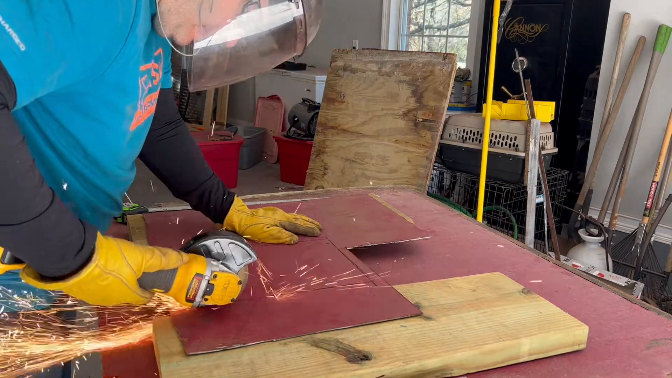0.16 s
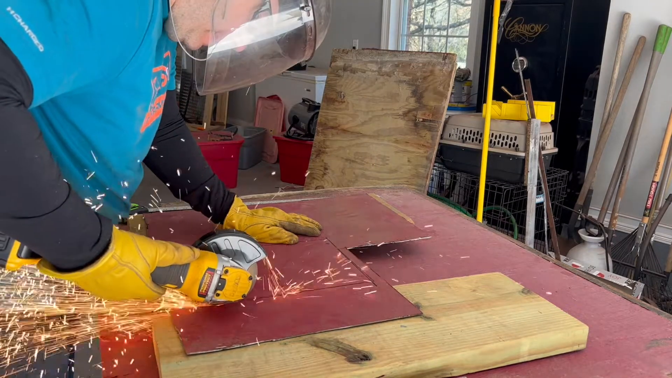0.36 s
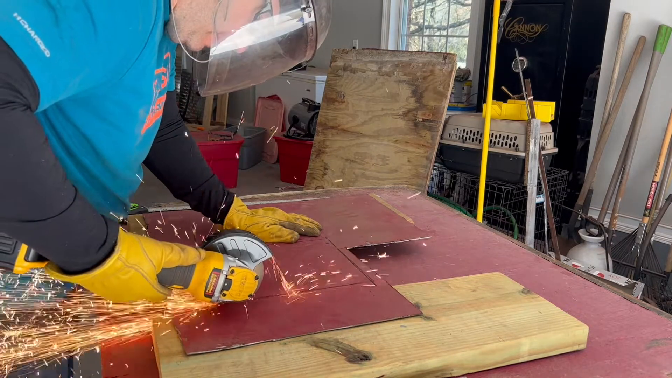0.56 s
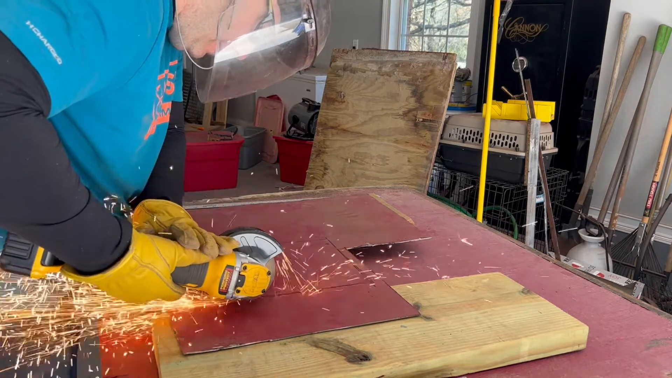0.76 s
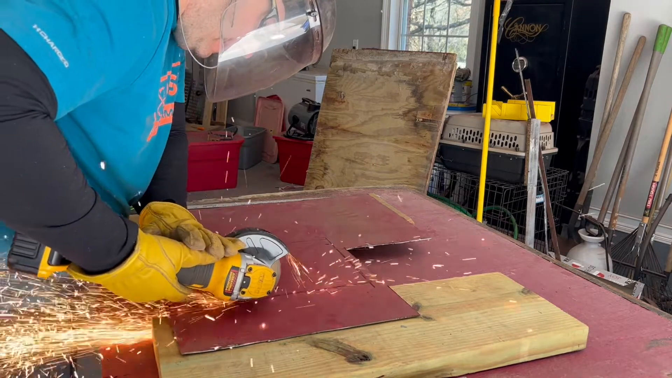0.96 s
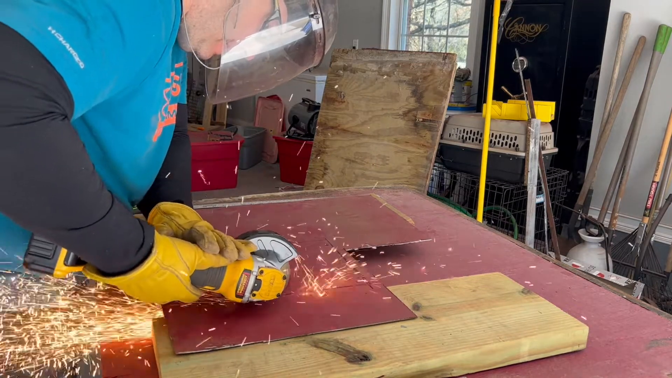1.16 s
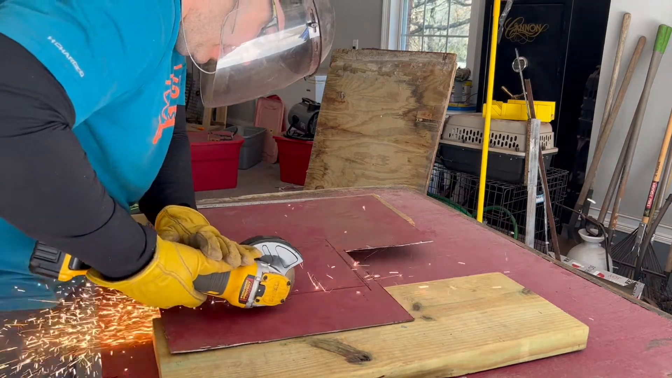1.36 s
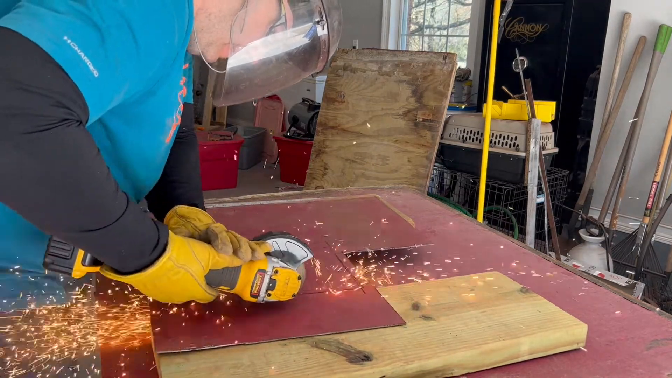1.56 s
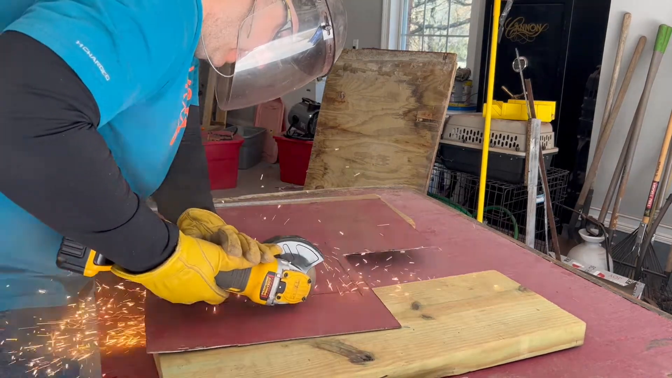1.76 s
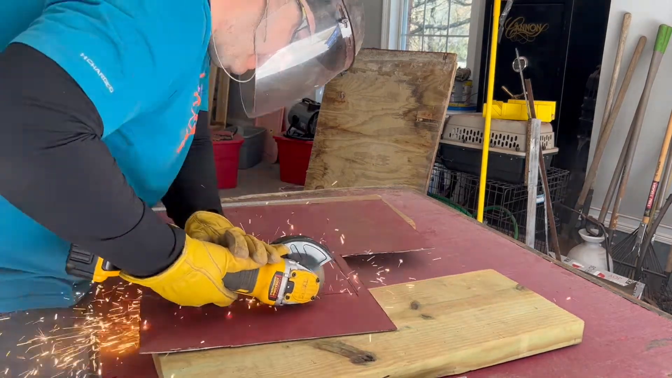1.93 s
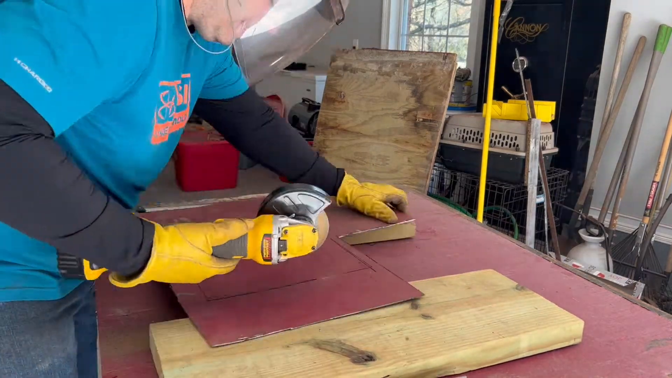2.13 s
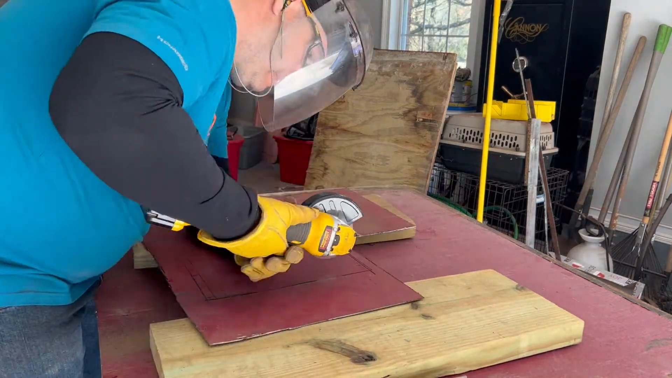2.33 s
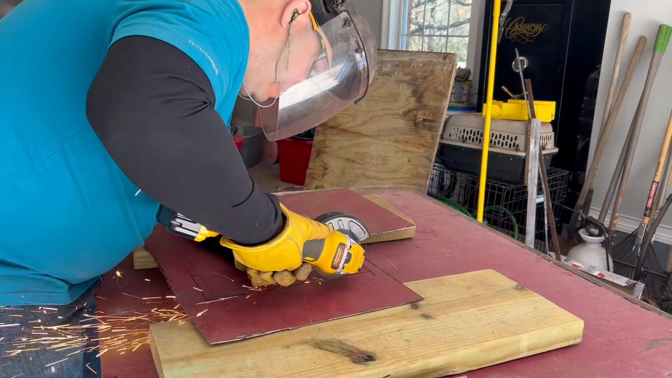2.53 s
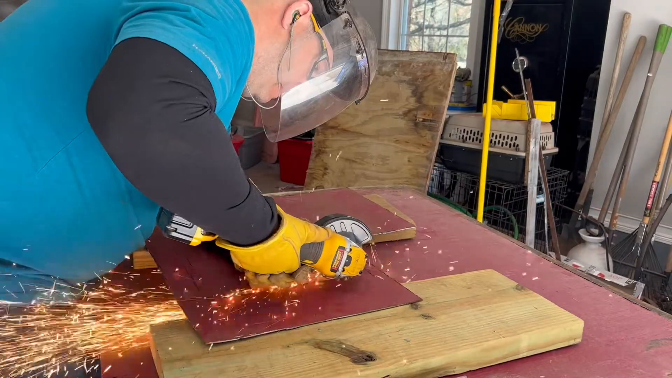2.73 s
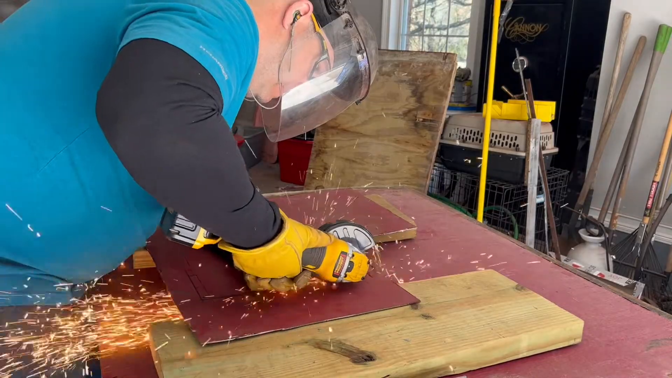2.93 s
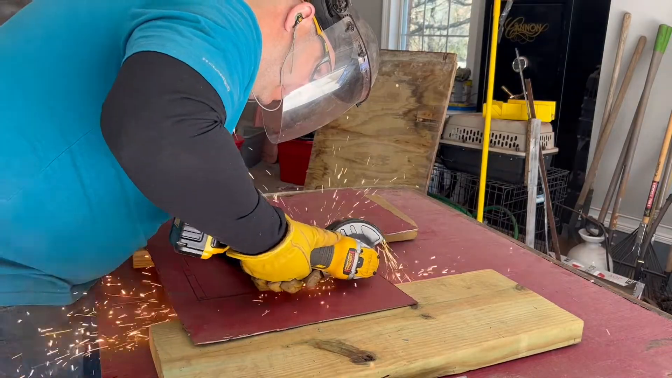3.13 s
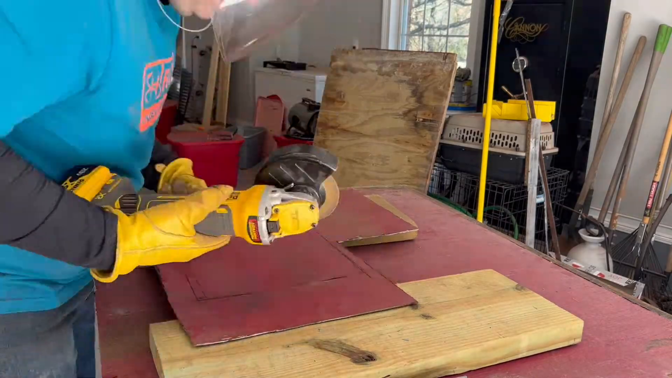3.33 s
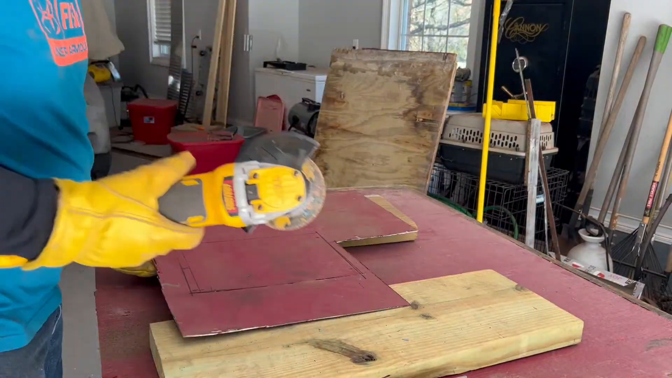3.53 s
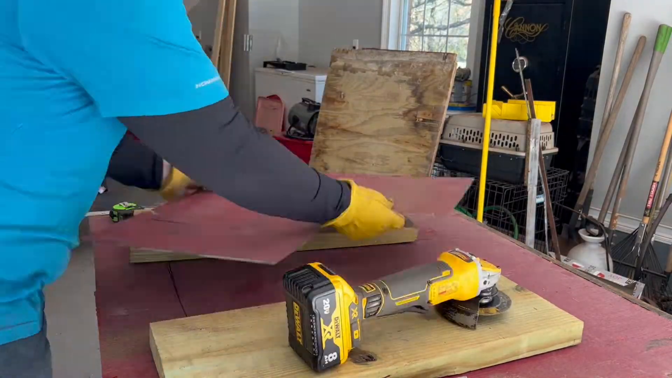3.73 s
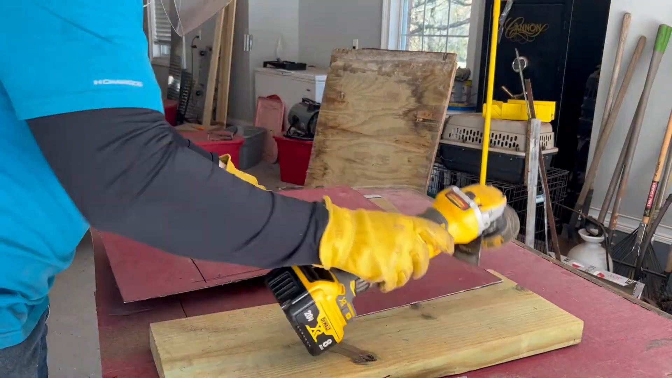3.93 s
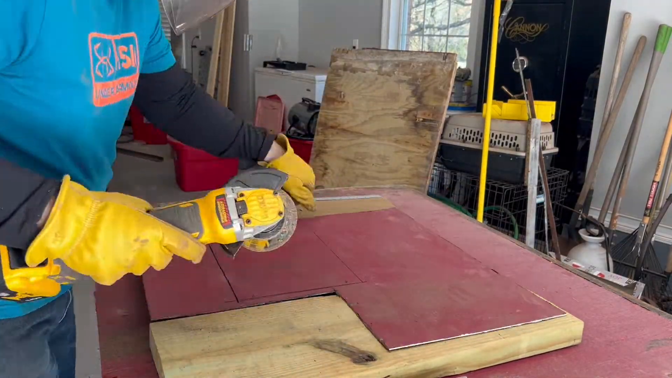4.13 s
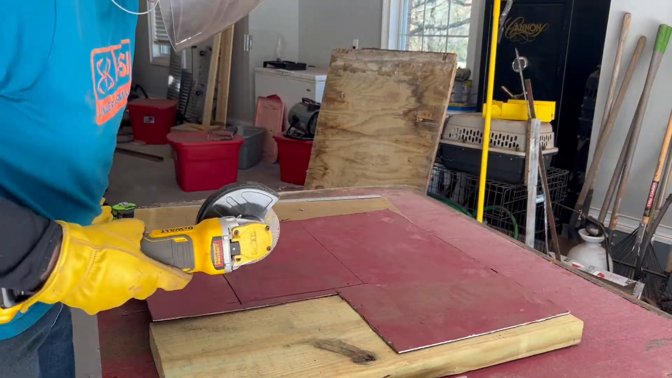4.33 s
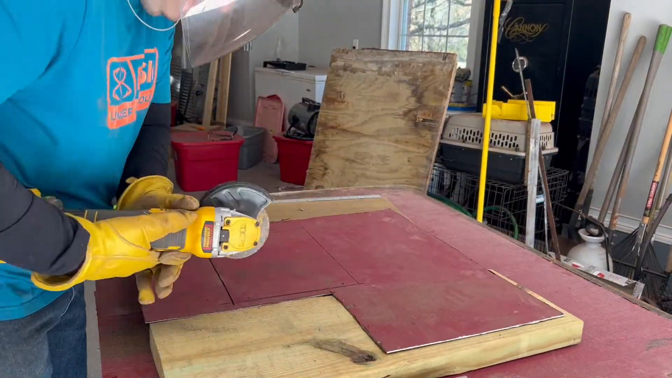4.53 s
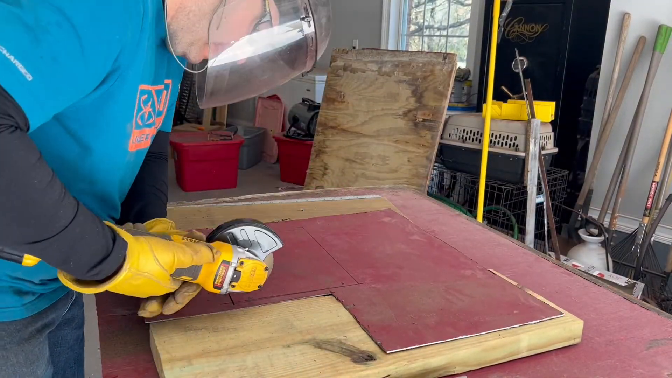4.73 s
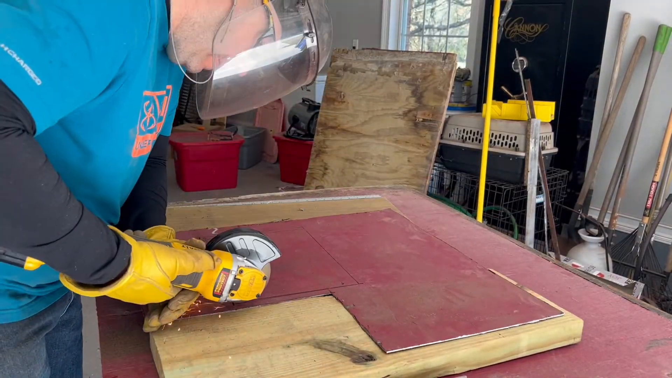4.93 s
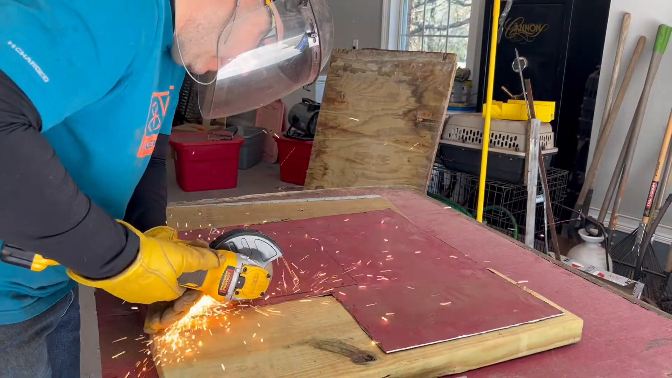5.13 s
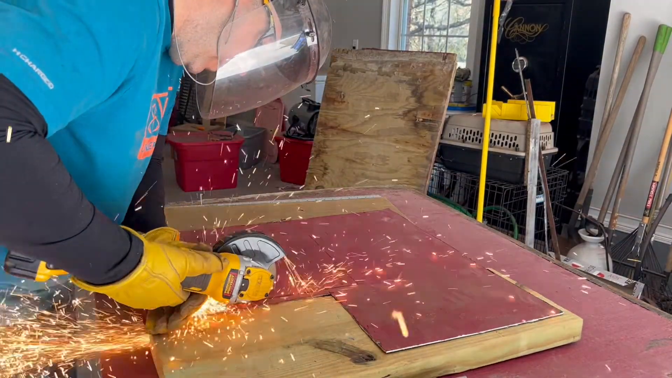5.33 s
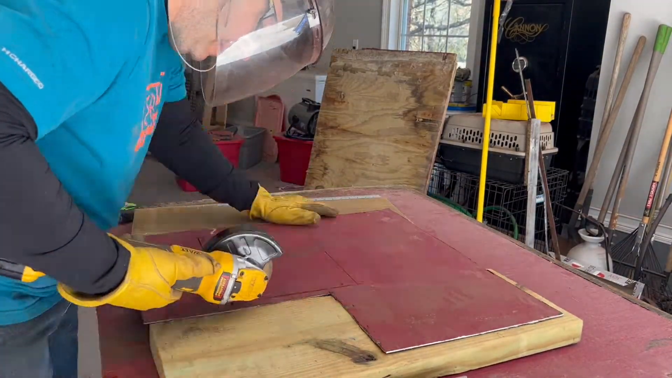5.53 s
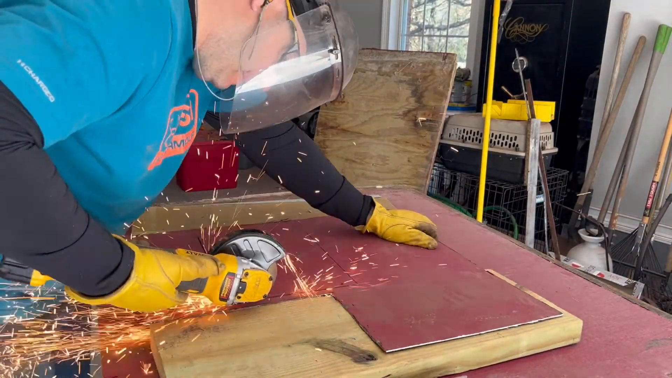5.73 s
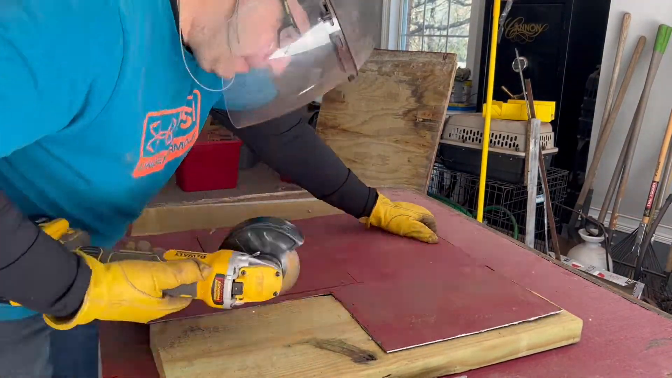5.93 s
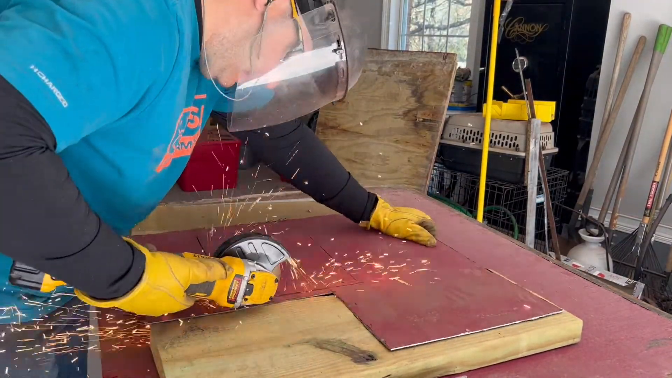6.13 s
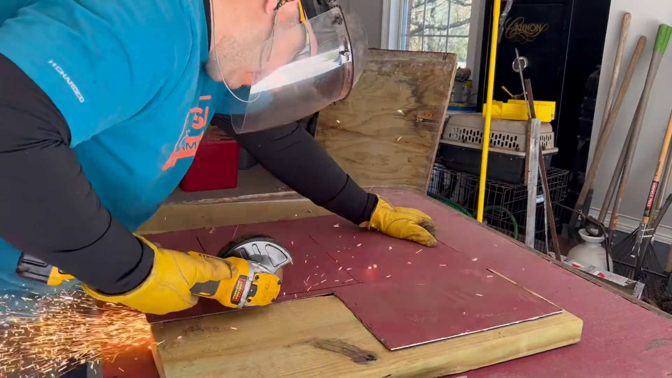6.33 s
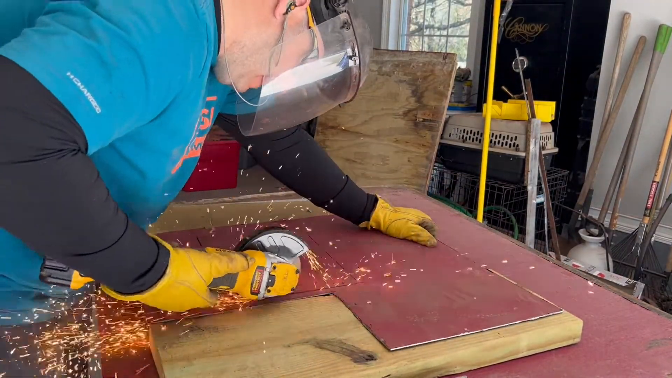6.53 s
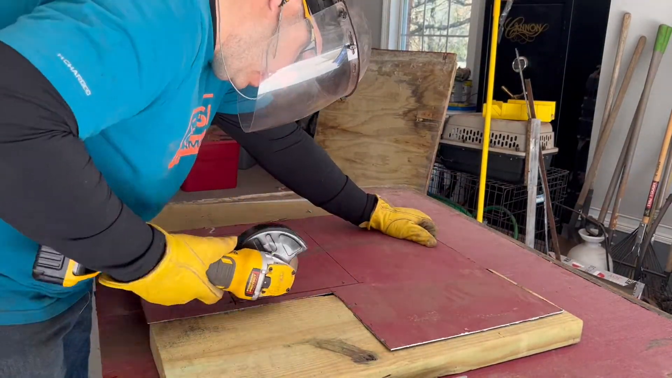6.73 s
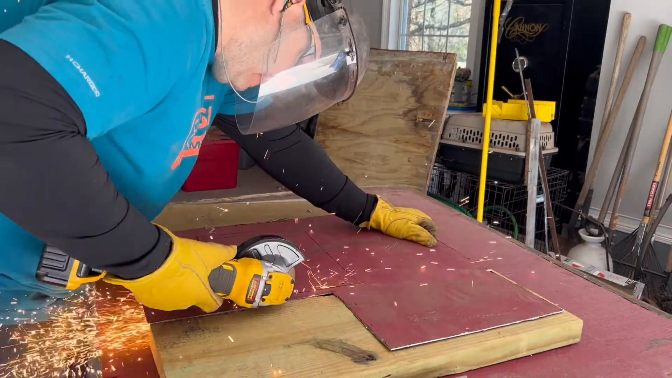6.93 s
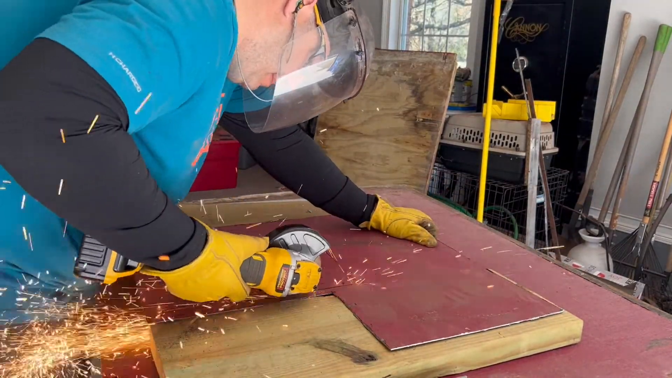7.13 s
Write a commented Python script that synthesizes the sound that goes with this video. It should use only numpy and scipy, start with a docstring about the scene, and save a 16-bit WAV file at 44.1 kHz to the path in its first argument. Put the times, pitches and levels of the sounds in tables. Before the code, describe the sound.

Close by in a workshop, an angle grinder cuts sheet steel with loud bright hiss, coarse rasp and a whine that sags and squeals under load. It lifts, runs free, bites again, then winds down. Sheet and tool clunk and scrape on wood in near quiet before the grinder restarts for several short cuts. Low air buffeting thumps the microphone early on.

```python
"""A cordless angle grinder cuts sheet steel on a bench: shaped noise gives the rasp of the wheel and the hiss,
and sines at multiples of the shaft speed give the whine, which drops in pitch under load and squeals in the
sheet. Running free, the tool sounds motor and controller tones. In a pause the sheet and tool are moved: dying
noise bursts through resonances make the knocks, and grains of noise make the dragging. A faint bright click
sounds at 6.04 s. Low, lumpy noise is air on the microphone; faint noise and tones are the shop. Both channels
are the same."""
import sys
import numpy as np
from scipy import signal
from scipy.fft import rfft, irfft, next_fast_len
from scipy.io import wavfile
from scipy.ndimage import uniform_filter1d, map_coordinates

SR = 44100
rng = np.random.default_rng(int(sys.argv[2]) if len(sys.argv) > 2 else 0)


def put_to_file(sound):
    """Save the sound as 16-bit audio at rate SR, in the file named by the first command-line argument."""
    columns = np.atleast_2d(sound).T  # one column per channel
    safe = np.clip(columns, -1, 1)
    whole_steps = np.round(safe * 32767)
    wavfile.write(sys.argv[1], SR, whole_steps.astype(np.int16))


N = 320607
T = np.arange(N) / SR  # time in seconds
TOP_HZ = 15850  # band limit
BITE_S, LIFT_S = 0.084, 0.023  # time for the wheel to enter and leave the steel

# The wheel is in the steel. Each row: bite and lift times in seconds, then base levels in dB, each at bite
# and at lift, of the rasp, the spark hiss and the whine.
CUTS = [(0.0, 1.985, -32.5, -29.5, -21.5, -21, -36, -38.5),
        (2.42, 3.21, -32.5, -28.5, -19, -19.5, -35.5, -37.5),
        (4.86, 5.446, -32.5, -30.5, -20.5, -19, -36.5, -38.5),
        (5.56, 5.86, -29.5, -31, -19.5, -20, -43, -36.5), (6.04, 6.56, -29, -29.5, -21, -22, -41, -41),
        (6.75, 7.3, -27, -30.5, -19.5, -22.5, -40, -36.5)]


def amp(db):
    """Decibels to amplitude: a factor of ten for every 20 dB."""
    return 10 ** (np.asarray(db) / 20)


def unit(x):
    """Normalization: x scaled to rms 1."""
    return x / np.sqrt(np.mean(x ** 2) + 1e-20)


def along(points, hz):
    """Interpolation of (Hz, value) points on a logarithmic frequency axis."""
    f, v = np.transpose(points)
    return np.interp(np.log(hz + 1), np.log(f + 1), v)


def curves(rows, outside=-120):
    """Linear interpolation over time of each column after the first, with a fixed value outside the rows."""
    s, *columns = np.transpose(rows)
    return np.array([np.interp(T, s, column, outside, outside) for column in columns])


def swell(start, end, edge):
    """Gating: 1 inside the interval, with linear edges centred on its ends."""
    return np.clip(np.minimum(T - start, end - T) / edge + .5, 0, 1)


def peaked(start, end, rise, fall):
    """Exponential growth and decay: 0 dB in the interval, straight slopes in dB a second outside it."""
    return -np.maximum(np.maximum((start - T) * rise, (T - end) * fall), 0)


def wobble(rate):
    """Slow random modulation: a smooth curve through random knots, rate of them a second."""
    knots = rng.standard_normal(int(N * rate / SR) + 4)
    return map_coordinates(knots, [T * rate])


def filtered(x, response):
    """Linear filtering: the spectrum of x times a response of frequency."""
    m = next_fast_len(len(x) + 8192)
    return irfft(rfft(x, m) * response(np.fft.rfftfreq(m, 1 / SR)), m)[:len(x)]


def modes(table):
    """Modal superposition: resonances of (Hz, width Hz, dB) summed with alternating sign."""
    return lambda f: sum((-1) ** k * amp(db) * 1j * f * width / (centre ** 2 - f * f + 1j * f * width)
                         for k, (centre, width, db) in enumerate(table))


def rush(spectrum, patchy_db):
    """Turbulence-like noise of rms 1: random gain in patches of time and frequency, then a spectral shape."""
    z = signal.stft(rng.standard_normal(N), nperseg=512)[2]
    patches = uniform_filter1d(rng.standard_normal(z.shape), 6, 0)  # across frequency
    patches = uniform_filter1d(patches, 10, 1)  # across time
    x = signal.istft(z * amp(patchy_db * unit(patches)), nperseg=512)[1][:N]
    return unit(filtered(x, lambda hz: amp(along(spectrum, hz))))


def wavering_sine(hz):
    """Frequency modulation: a sine of rms 1 whose pitch wanders slightly at random."""
    wandering_hz = hz * (1 + 0.00069 * wobble(30))
    return np.sqrt(2) * np.sin(2 * np.pi * np.cumsum(wandering_hz) / SR)


def grinder():
    """Abrasion and rotation: broadband rasp and hiss with harmonics locked to the shaft angle."""
    # Motor shaft, one list for each cut. Each row: time in seconds, mean turns a second in Hz.
    shaft_points = [
        [(0.0, 419.5), (0.07, 475.5), (0.105, 479.3), (0.215, 456), (0.279, 431.3), (0.369, 438.4),
         (0.404, 418.3), (0.464, 429.3), (0.534, 418), (0.654, 444.9), (0.698, 411.2), (0.808, 406.6),
         (0.838, 395.3), (0.868, 403), (0.968, 393.4), (1.028, 402), (1.137, 374), (1.287, 386.1),
         (1.372, 344.3), (1.442, 381.8), (1.487, 379.5), (1.546, 360), (1.606, 355.4), (1.741, 310.2),
         (1.831, 341), (1.926, 332)],
        [(2.434, 498.3), (2.529, 487), (2.649, 422.1), (2.699, 404.3), (2.754, 391.7), (2.844, 387),
         (2.898, 364.1), (2.958, 385), (3.068, 367.6), (3.198, 404.6)],
        [(4.884, 484), (4.919, 497), (5.014, 492.6), (5.054, 462.1), (5.098, 452.6), (5.163, 412.8),
         (5.378, 371.1), (5.428, 381.2)],
        [(5.622, 493.3), (5.687, 482), (5.767, 428), (5.802, 441.5), (5.822, 433), (5.867, 453.6)],
        [(6.101, 438.4), (6.126, 438.4), (6.221, 398.7), (6.246, 397.5), (6.281, 462.8), (6.326, 465.8),
         (6.361, 441), (6.395, 446), (6.525, 395.2)],
        [(6.765, 496.4), (6.844, 492.5), (6.889, 446.2), (6.954, 442), (6.974, 425.5), (7.049, 408.8),
         (7.149, 444.5), (7.194, 399.6), (7.263, 398)],
    ]
    # Rasp of the wheel. Each row: frequency in Hz, relative spectral density in dB per Hz.
    rasp_colour = [(82, -43.5), (140, -19), (214, -8.5), (642, -7), (861, -6.5), (950, -7), (2190, -8),
                   (2710, -4.5), (3040, -8.5), (5940, -8.5), (7000, -8), (9100, -28), (15400, -120)]
    # Hiss of fan and sparks. Each row: frequency in Hz, relative spectral density in dB per Hz.
    hiss_colour = [(88, -50.5), (150, -22.5), (315, -13.5), (382, -12), (522, -12.5), (1050, -14),
                   (3460, -3.5), (3740, -5.5), (9900, 0), (11800, 2), (14900, 1.5), (15800, 0.5)]
    steady = np.interp(T, *np.concatenate(shaft_points).T)
    rasp, hiss, whine = effort(steady)
    shaft = steady * (1 + .0033 * wobble(60))  # speed trembles slightly at random
    turn = 2 * np.pi * np.cumsum(shaft) / SR  # shaft angle in radians
    beat = 1 + 0.22 * np.sin(turn / 7.4)  # the wheel is not quite round
    wheel = rasp * beat * rush(rasp_colour, patchy_db=1.7)
    fan_and_sparks = hiss * rush(hiss_colour, patchy_db=.9)
    return wheel + fan_and_sparks + shaft_orders(shaft, turn, whine) + sheet_roars()


def shaft_orders(shaft, turn, whine):
    """Order spectrum: sines at multiples of shaft speed break up and return as the wheel chatters."""
    # Colour of the whine. Each row: frequency in Hz, relative level in dB.
    whine_colour = [(700, -9.5), (2350, -4.5), (2850, 2), (3600, -5.5), (6500, -1.5), (10000, -3),
                    (15000, 3.5)]
    # One order squeals in the sheet. Each row: start and end in seconds, order, level in dB before chatter.
    squeal_rows = [(0.0, 0.177, 6, -34), (0.043, 0.83, 2, -40), (0.06, 0.23, 14, -31),
                   (0.106, 0.698, 4, -38), (0.113, 0.267, 12, -30.5), (0.133, 0.23, 22, -29.5),
                   (0.197, 0.39, 6, -22.5), (0.249, 0.354, 7, -32), (0.257, 0.44, 8, -34.5),
                   (0.261, 0.652, 24, -29), (0.39, 0.65, 14, -35), (0.39, 0.572, 6, -31.5),
                   (0.578, 0.69, 6, -22), (0.67, 0.964, 16, -24), (0.679, 0.768, 20, -22.5),
                   (0.684, 0.82, 8, -31.5), (0.691, 0.808, 7, -36), (0.815, 1.014, 18, -31.5),
                   (0.82, 1.02, 34, -31), (0.827, 1.05, 7, -34.5), (0.971, 1.1, 14, -31),
                   (0.998, 1.216, 22, -25), (1.02, 1.18, 10, -33.5), (1.08, 1.25, 8, -33.5),
                   (1.431, 1.533, 14, -28), (1.432, 1.591, 8, -35), (1.437, 1.536, 4, -28.5),
                   (2.473, 2.63, 30, -26.5), (2.508, 2.635, 6, -22.5), (2.64, 2.8, 6, -30),
                   (2.51, 2.6, 2, -38), (2.541, 2.71, 28, -31), (2.552, 2.709, 14, -27.5),
                   (2.6, 2.71, 12, -28.5), (2.611, 2.79, 8, -24.5), (2.663, 2.79, 20, -23),
                   (2.69, 2.84, 16, -31), (2.875, 2.92, 16, -24), (2.902, 3.093, 8, -32),
                   (2.929, 3.104, 4, -34), (4.9, 5.02, 28, -30.5), (4.911, 5.067, 2, -28.5),
                   (4.933, 4.988, 24, -23.5), (4.961, 5.03, 26, -25), (4.892, 5.0, 4, -37.5),
                   (5.01, 5.129, 4, -27.5), (5.16, 5.34, 4, -39.5), (5.013, 5.195, 8, -29.5),
                   (5.016, 5.144, 16, -26.5), (5.048, 5.11, 18, -23.5), (5.05, 5.164, 14, -27.5),
                   (5.06, 5.19, 2, -37), (5.063, 5.142, 6, -16), (5.15, 5.299, 6, -24),
                   (5.151, 5.41, 30, -33.5), (5.156, 5.377, 26, -25), (5.185, 5.241, 38, -21.5),
                   (5.307, 5.425, 16, -24.5), (5.643, 5.86, 2, -39), (5.702, 5.841, 4, -39.5),
                   (5.764, 5.847, 6, -34), (5.78, 5.85, 18, -28.5), (6.135, 6.184, 18, -25),
                   (6.136, 6.2, 16, -26), (6.164, 6.26, 6, -33.5), (6.281, 6.414, 6, -31.5),
                   (6.426, 6.49, 14, -27), (6.781, 7.0, 4, -39.5), (6.857, 6.95, 6, -28.5),
                   (7.047, 7.089, 7, -30), (7.087, 7.232, 24, -26.5), (7.1, 7.273, 6, -31),
                   (7.163, 7.27, 7, -33), (7.174, 7.266, 20, -30)]
    out = np.zeros(N)
    for k in range(2, 46):
        chatter = 4.65 * wobble(70)  # dB
        flare = 5 * np.tanh(wobble(18))  # dB
        colour = along(whine_colour, k * shaft) - 12.8 * (k % 2)  # odd orders are weak
        level = whine * amp(colour + flare + chatter)
        squeal = sum(amp(db) * swell(start, end, .032)
                     for start, end, order, db in squeal_rows if round(order) == k)
        level = np.maximum(level, squeal * amp(0.66 * chatter))
        in_band = k * shaft < TOP_HZ
        out += np.sqrt(2) * level * in_band * np.sin(k * turn + 2 * np.pi * rng.random())
    return out


def sheet_roars():
    """Resonance: noise through a narrow band, applied twice, is the sheet roaring under the wheel."""
    # Each row: start and end in seconds, centre in Hz, width of one band pass in Hz, level in dB.
    roar_rows = [(3.055, 3.2, 6300, 400, -25), (6.5, 6.55, 2750, 400, -28), (6.058, 6.075, 6000, 600, -33)]
    out = np.zeros(N)
    for start, end, hz, width, db in roar_rows:
        band = modes([(hz, width, 0)])
        roar = unit(filtered(rng.standard_normal(N), lambda f: band(f) ** 2))
        out += amp(db) * swell(start, end, 0.017) * roar
    return out


def effort(shaft):
    """Load and speed: the further the shaft sags below its free speed, the louder the rasp and hiss."""
    # Stretches of motor sound. Each row: start, start of fading and end limit in seconds, fan hiss and idle
    # rasp levels in dB, loss of hiss while fading in dB a second.
    motor_rows = [(0.0, 3.0, 2.6, -25.5, -44.5, 60), (3.1, 3.19, 3.435, -23.5, -43, 53.5),
                  (4.619, 5.876, 6.045, -25, -42.5, 65), (6.049, 7.3, 7.4, -24.5, -39, 60)]
    rise_s, stop_s = 0.027, 0.015
    rasp_fades = 1.8  # the idle rasp fades this much faster than the fan
    idle_hz, full_sag_hz = 500, 140  # shaft speed with no load; beyond this drop the cut grows no louder
    rasp_db_per_hz, hiss_db_per_hz, unsteady_db = 0.0416, .025, 1.12
    idle = np.full((2, N), -120.)  # rasp and hiss in dB
    for start, fade_start, limit, hiss_db, rasp_db, fade_db in motor_rows:
        rise = (T - start) / rise_s + (start < rise_s)  # from 0 s: already running
        gate = np.clip(np.minimum(rise, (limit - T) / stop_s), 1e-6, 1)
        lost_db = fade_db * np.maximum(T - fade_start, 0)
        levels = [rasp_db - rasp_fades * lost_db, hiss_db - lost_db]
        idle = np.maximum(idle, 20 * np.log10(gate) + levels)
    sag = np.minimum(idle_hz - uniform_filter1d(shaft, SR // 8), full_sag_hz)
    (rasp, hiss), whine = idle, np.zeros(N)
    for start, end, *ends in CUTS:
        rasp_db, hiss_db, whine_db = (np.interp(T, [start, end], pair) for pair in np.reshape(ends, (-1, 2)))
        depth = bite(start, end)
        rasp = rasp + depth * (rasp_db + rasp_db_per_hz * sag - rasp)
        hiss = hiss + depth * (hiss_db + hiss_db_per_hz * sag - hiss)
        whine += depth ** 2 * amp(whine_db)
    unsteady = unsteady_db * wobble(12)
    return amp(rasp + unsteady), amp(hiss + unsteady), whine


def bite(start, end):
    """Engagement: how far the wheel is in the steel, 0-1; a cut from 0 s is already under way."""
    entering = (T - start) / BITE_S + (start < BITE_S)
    return np.clip(np.minimum(entering, (end - T) / LIFT_S), 0, 1)


def free_running_tones():
    """Tonal emission: near-fixed motor and controller tones of the free tool, and one gliding down as it stops."""
    # Running free. Each row: start and end in seconds, level in dB to which each tone's own is added.
    free_rows = [(2.001, 2.16, -46), (2.16, 2.45, -41.5), (4.68, 4.93, -44), (5.45, 5.623, -45),
                 (6.56, 6.8, -45)]
    # Motor and controller tones. Each row: frequency in Hz, mean level in dB relative to the stretch.
    tone_rows = [(3542, -2), (12190, -4), (15720, 2)]
    # The motor tone runs down. Each row: time in seconds, frequency in Hz, level in dB.
    coast_rows = [(3.21, 3560, -47), (3.27, 3520, -48), (3.3, 3050, -49), (3.345, 2200, -51)]
    free = sum(amp(db) * swell(start, end, .03) for start, end, db in free_rows)
    motor = sum(amp(db + 3.4 * wobble(40)) * wavering_sine(hz) for hz, db in tone_rows)
    coast_hz, coast_db = curves(coast_rows)
    coast = amp(coast_db) * wavering_sine(np.abs(coast_hz))  # outside the rows: inaudible
    return free * motor + coast


def sheet_response(low, mid, high):
    """Modal response: low and upper modes of the sheet ring, and a broad filter passes bright clatter."""
    # Sheet resonances, first three low. Each row: centre in Hz, width in Hz, relative level in dB.
    sheet_modes = [(998, 100, 2.5), (1059, 60, 2), (1420, 91, -2.5), (2625, 150, 2), (2930, 250, 1.5),
                   (3600, 170, -20), (4800, 300, -34.5), (6200, 400, -12.5)]
    # Clatter. Each row: frequency in Hz, filter gain in dB before a common 9 dB lift.
    clatter_colour = [(180, -45), (300, -24), (798, -23), (1060, -13), (2120, -13), (2860, -16),
                      (3550, -12), (15800, -19)]
    bright = lambda hz: amp(along(clatter_colour, hz) + 9)
    ringing = filtered(low, modes(sheet_modes[:3])) + filtered(mid, modes(sheet_modes[3:]))
    return ringing + filtered(high, bright)


def knocks_and_click():
    """Impulse excitation: dying noise bursts through resonances make the knocks, and a faint bright click."""
    # Knocks, and last the click at 6.04 s. Each row: time in seconds, drive level in dB, upper modes and
    # treble in dB relative to it (a fixed trim is added to all three), time in seconds of a 60 dB decay,
    # before the tail is cut short.
    burst_rows = [(2.137, -19.5, -13, 4, 0.18), (3.464, -48.5, -15, -7.5, 0.08),
                  (3.498, -34, -17, -21, 0.06), (3.551, -50, -12, -6, 0.095),
                  (3.577, -14.5, -21, -20, 0.12), (3.601, -15.5, -25, -8, 0.15),
                  (3.759, -24, -21, -8.5, 0.13), (3.855, -42.5, -15, -15, 0.11),
                  (3.872, -32, -19, -26.5, 0.084), (3.904, -36.5, -21, -14, 0.11),
                  (3.995, -27.5, -15, -16.5, 0.13), (4.118, -16, -1, -4, 0.17),
                  (4.259, -34, -18, -19, 0.11), (4.368, -28, -15, -26, 0.055), (6.039, -39, -4, 6, 0.03)]
    low, mid, high = np.zeros((3, N))
    t = T[:SR // 4]
    for s, db, ring_db, treble_db, t60 in burst_rows:
        fade = amp(-60 * t / np.clip(t60, .02, .4)) + 2.1 * amp(-60 * t / .012)  # body and sharp onset
        fade *= np.clip((.085 - t) / 0.069, 0, 1)  # the tail stops short
        burst = fade * rng.standard_normal((3, len(t)))
        first = round(s * SR)
        low[first:][:len(t)] += amp(db + 0.5) * burst[0]
        mid[first:][:len(t)] += amp(db + ring_db + 6.5) * burst[1]
        high[first:][:len(t)] += amp(db + treble_db + 1) * burst[2]
    return sheet_response(low, mid, high)


def dragging():
    """Friction: grains of noise excite the sheet as it is dragged on wood."""
    # Each row: start and end in seconds, drive level in dB, treble in dB relative to it (before fixed gains).
    stroke_rows = [(3.492, 3.49, -55, -10), (3.552, 3.573, -59, 5), (3.66, 3.704, -68, 2.5),
                   (3.873, 3.93, -65, -4.5), (3.938, 3.99, -60.5, 7), (3.993, 4, -45, -11.5),
                   (4.035, 4.079, -55.5, -2), (4.262, 4.3, -60, -9), (4.324, 4.345, -64.5, -3),
                   (4.368, 4.368, -51, -25)]
    grip_db_per_s, slip_db_per_s, rest_db = 2500, 600, -75
    grains = unit(rng.standard_normal(N) * amp(3.6 * wobble(60)))
    strokes = [(db + peaked(start, end, grip_db_per_s, slip_db_per_s), treble_db)
               for start, end, db, treble_db in stroke_rows]
    rustle = amp(rest_db) * swell(stroke_rows[0][0], stroke_rows[-1][1], .1)
    drag = (rustle + sum(amp(db) for db, _ in strokes)) * grains
    scratch = (rustle + sum(amp(db + treble_db) for db, treble_db in strokes)) * grains
    return sheet_response(amp(17.0) * drag, amp(10.5) * drag, amp(9.5) * scratch)


def air_and_thrum():
    """Pressure fluctuation: lumpy low noise is air on the microphone and the bench thrumming under the wheel."""
    # Puffs of air. Each row: start and end in seconds, buffet level in dB, upper flutter in dB relative to it.
    puff_rows = [(0.0, 0.02, -34.5, -5), (0.438, 0.487, -19, -2.5), (0.554, 0.626, -26.5, -10),
                 (0.802, 0.835, -18.5, -18), (1.452, 1.472, -20, -3), (1.65, 1.68, -16.5, -8),
                 (1.77, 1.79, -20.5, -8), (1.99, 2.054, -19.5, -14.5), (2.118, 2.18, -23, -14),
                 (2.23, 2.27, -24, -11), (2.348, 2.406, -25, -12.5), (3.987, 4.18, -37, -21),
                 (4.253, 4.327, -39.5, -42), (4.4, 4.524, -30.5, -31.5)]
    rise_db_per_s, fall_db_per_s = 350, 200.5
    draught_db, thrum_idle_db, thrum_cut_db = -45.5, -61.5, -43.5
    # (Hz, relative dB) colours
    deep_colour = [(4, -1.5), (15, 3.5), (40, 2.5), (80, -10.0), (130, -33.0), (250, -55.5), (20000, -120)]
    upper_colour = [(30, -12), (70, 1.5), (130, 1.5), (200, -6.5), (300, -18.5), (600, -59.0), (20000, -120)]
    puffs = [(db + peaked(start, end, rise_db_per_s, fall_db_per_s), upper_db)
             for start, end, db, upper_db in puff_rows]
    buffet = amp(draught_db) + sum(amp(db) for db, _ in puffs)
    cutting = sum(bite(start, end) for start, end, *_ in CUTS)
    thrum = amp(thrum_idle_db) + amp(thrum_cut_db) * cutting
    flutter = thrum + sum(amp(db + upper_db) for db, upper_db in puffs)
    lumps = amp(4.2 * np.tanh(wobble(30)))
    deep = unit(lumps * rush(deep_colour, patchy_db=0.45))
    upper = unit(lumps * rush(upper_colour, patchy_db=3.5))
    return buffet * deep + flutter * upper


def shop():
    """Ambient noise floor: quiet coloured noise and faint, slightly wavering tones."""
    # Noise of the shop. Each row: frequency in Hz, relative spectral density in dB per Hz.
    shop_colour = [(120, -50.5), (200, -18), (245, -18.5), (527, -34.5), (567, -19), (774, -29),
                   (14200, -27), (15000, -22), (15800, -44)]
    # Faint tones. Each row: frequency in Hz, mean level in dB.
    hum_rows = [(3736, -82), (14944, -76)]
    hum = sum(amp(db + 2 * wobble(20)) * wavering_sine(hz) for hz, db in hum_rows)
    return amp(-65) * rush(shop_colour, patchy_db=3.5) + hum


def scene():
    """Superposition: all sources add at one microphone, copied to two channels."""
    tool = grinder() + free_running_tones()
    handling = knocks_and_click() + dragging()
    return np.tile(tool + handling + air_and_thrum() + shop(), (2, 1))


def record(dry):
    """Saturation and band limiting: the loudest peaks are rounded off, then nothing is kept above TOP_HZ."""
    soft = dry / (1 + np.abs(dry / .8) ** 6) ** (1 / 6)
    return np.array([filtered(x, lambda hz: hz < TOP_HZ) for x in soft])


dry = scene()
out = record(dry)
put_to_file(out)
```